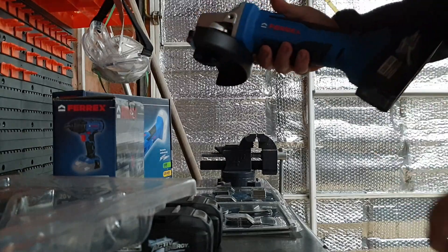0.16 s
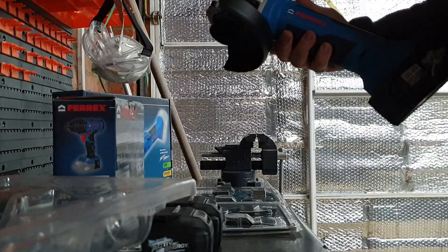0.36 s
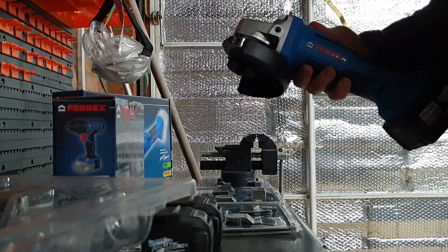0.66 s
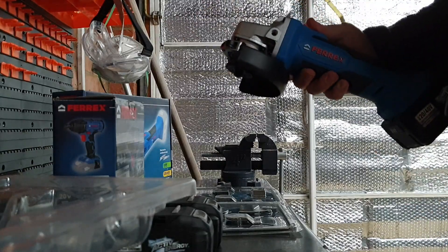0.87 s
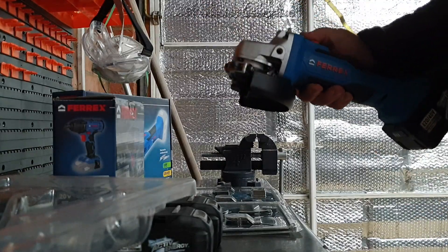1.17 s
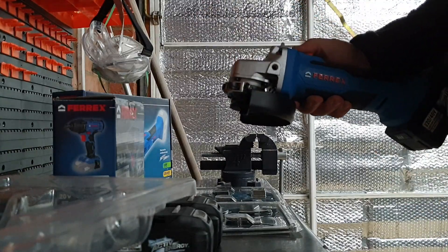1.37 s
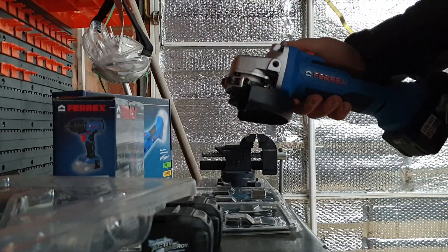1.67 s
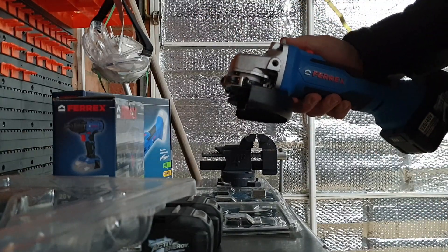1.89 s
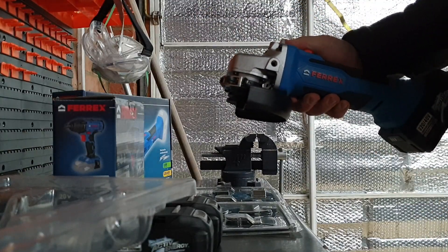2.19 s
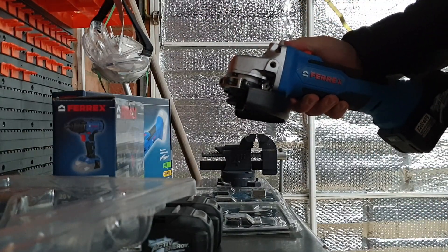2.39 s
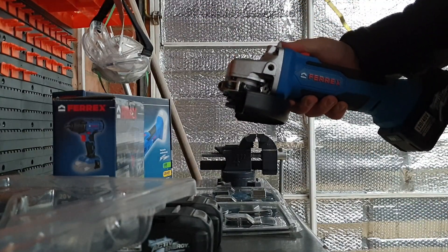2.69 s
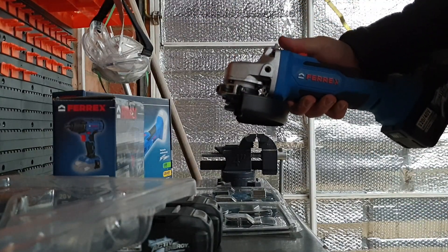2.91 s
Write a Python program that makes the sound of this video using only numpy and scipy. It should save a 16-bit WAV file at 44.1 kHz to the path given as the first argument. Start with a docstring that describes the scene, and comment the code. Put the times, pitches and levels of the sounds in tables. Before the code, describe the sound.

A cordless angle grinder in a small shed: light knocks and faint cloth rustle, a sharp switch snap, then the motor soft-starts, its gear rattle and whine climbing to the end, heard close in stereo.

```python
"""Small shed: a cordless angle grinder is handled, switched on and soft-starts in the air.
Knocks, cloth rustle and switch snaps are coloured noise; the controller whistles at a fixed pitch.
One rotor speed drives the gear knocks and sine whine; bevel gears rattle in their ringing metal head.
Brush hiss and fan air are filtered noise on level curves; faint hiss and low rumble lie beneath."""
import sys
import numpy as np
from scipy import signal
from scipy.fft import rfft, irfft, next_fast_len
from scipy.io import wavfile
from scipy.ndimage import uniform_filter1d

SR = 44100
rng = np.random.default_rng(int(sys.argv[2]) if len(sys.argv) > 2 else 0)


def materialize(psi):
    """Save the field psi as 16-bit PCM at rate SR to the path in sys.argv[1].

    A 1-D psi becomes a single channel; in a 2-D psi each row is a channel.
    """
    bounded = np.clip(np.atleast_2d(psi).T, -1, 1)
    quanta = np.round(bounded * 32767).astype(np.int16)
    wavfile.write(sys.argv[1], SR, quanta)


N = 134505
ROOM_DB = 5.5  # reflections re direct, gears and brushes
STANDSTILL_HZ = 4  # rotor speed at the start of the run-up

# ringing of gear head and guard: f/Hz, width/Hz, lift/dB
RINGS = [(790,80,3),(1190,70,4),(1785,60,4),(1910,45,8),(2205,20,4),(2443,14,11),(2765,50,3),(2975,70,3),(3805,20,5),(4225,40,5),(4695,35,8),(5530,100,4),(8950,120,4),(9670,130,4),(12300,170,4),(13750,260,7)]


def amp(db):
    """Decibels to gain."""
    return 10 ** (np.asarray(db) / 20)


def unit(x):
    """Scales to rms 1."""
    return x / np.sqrt(np.mean(x ** 2) + 1e-20)


def curve(points):
    """Control curve at every sample, linear between points."""
    return np.interp(np.arange(N) / SR, *np.transpose(points))


def read(points, hz):
    """Spectrum table read on a log-frequency axis."""
    f, value = np.transpose(points)
    return np.interp(np.log(hz + 1), np.log(f), value)


def tilted(points, db_per_octave):
    """Adds a constant slope per octave to a spectrum table."""
    return [(f, db + db_per_octave * np.log2(f)) for f, db in points]


def add(mix, s, sound):
    """Mixes a sound in at a time."""
    part = mix[round(s * SR):][:len(sound)]
    part += sound[:len(part)]


def colour(x, points, rings=(), size=4096):
    """Minimum-phase filter: broad colour plus narrow resonances, taps of unit energy."""
    hz = abs(np.fft.fftfreq(size, 1 / SR))
    peaks_db = sum(lift / (1 + (2 * (hz - f) / width) ** 2) for f, width, lift in rings)
    log_gain = np.log(amp(read(points, hz) + peaks_db))
    taps = np.fft.ifft(np.exp(np.conj(signal.hilbert(log_gain)))).real
    taps /= np.linalg.norm(taps)
    return np.apply_along_axis(signal.fftconvolve, -1, x, taps)[..., :N]


def drift(rate_hz):
    """Random wander of rms 1: noise under a Gaussian lowpass."""
    hz = np.fft.rfftfreq(N, 1 / SR)
    return unit(irfft(rfft(rng.standard_normal(N)) * np.exp(-(hz / rate_hz) ** 2), N))


def gears(speed, turns):
    """Each tooth contact knocks with random strength; the rattle's colour shifts with speed."""
    # gear rattle: t/s, level/dB
    rattle_level = [(.91,-55),(.98,-46),(1.04,-37.5),(1.17,-34),(1.2,-31.5),(1.36,-27.3),(1.5,-26.3),(1.7,-24.2),(1.8,-22.5),(2.1,-21.7),(3.03,-21.3)]
    # rattle spectra at low and high speed: f/Hz, level/dB
    slow_colour = [(600,-35.5),(1100,-16),(1600,-15),(1800,-4.5),(1930,-3.5),(2100,-6.5),(2400,0),(3000,0.5),(3700,-5.5),(4500,-14.5),(5200,-9),(6200,-17.5),(7200,-36.5),(9000,-48)]
    fast_colour = [(600,-32),(1100,-53.5),(1600,-30.5),(2100,-10.5),(2600,-4.5),(3200,-2.5),(3900,-0.5),(4500,-7.5),(5500,-8.5),(6300,-9),(7000,-25.5),(7600,-22.5),(8400,-15.5),(11000,-95.5)]
    teeth, knock_share, turn_throb = 13, .45, .28
    slow_hz, fast_hz = 23.1, 217.6  # rotor speeds of the two spectra

    tooth_count = np.floor(teeth * turns + .15 * drift(900))
    mesh = np.diff(tooth_count, prepend=0) > 0
    knocks = mesh * rng.standard_normal(N) / np.sqrt(speed + 30)
    drive = knock_share * unit(knocks) + (1 - knock_share) * rng.standard_normal(N)
    drive *= 1 + turn_throb * np.cos(2 * np.pi * turns)
    drive = spread(drive, ROOM_DB) * amp(.5 * drift(23))
    fast = np.clip((speed - slow_hz) / (fast_hz - slow_hz), 0, 1)
    rattle = (1 - fast) * colour(drive, slow_colour, RINGS) + fast * colour(drive, fast_colour, RINGS)
    power = uniform_filter1d((rattle ** 2).mean(0), size=8000)  # keeps the blend evenly loud
    return rattle / np.sqrt(power) * amp(curve(rattle_level))


def whine(speed, turns):
    """Rotor orders sweep up through the response of the head; unbalance hums near full speed."""
    # gear mesh, sidebands and commutator: multiples of rotor speed
    multiples = [11, 12, 13, 14, 15, 16, 17, 18, 26, 27, 35]
    # their strengths ahead of the head response: level/dB
    order_db = [-62, -44.5, -32, -39, -47, -46, -46, -35, -45, -65, -64]
    # response of the head: f/Hz, level/dB
    head_colour = [(300,-40),(1500,-25),(2300,-5),(3300,-3),(3800,0),(5000,-10),(6500,-10),(7500,-1),(10000,2),(13000,-8)]
    # hum at rotor speed: t/s, level/dB
    unbalance_level = [(2.2,-85),(2.6,-69.5),(2.75,-60),(2.9,-51.5),(3.04,-52.5)]
    reference_hz, db_per_doubling = 278, 5

    lines = np.zeros(N)
    for k, db in zip(multiples, order_db):
        level_db = db + read(head_colour, k * speed) + 3 * drift(49)
        lines += amp(level_db) * np.sin(2 * np.pi * (k * turns + rng.random()))
    lines *= amp(db_per_doubling * np.log2(speed / reference_hz))
    hum = amp(curve(unbalance_level)) * np.sin(2 * np.pi * turns)
    return np.sqrt(2) * (lines + hum)


def controller():
    """Chopped motor current whistles in the windings at a fixed pitch, wavering as the tool moves."""
    # whistle: t/s, level/dB
    whistle_level = [(.909,-47.5),(.95,-45.5),(1.05,-40.5),(1.21,-38),(1.32,-37),(1.6,-41),(1.85,-40.5),(2.2,-45.5),(2.7,-36),(3.04,-48)]
    chop_hz = 3968
    phase = 2 * np.pi * chop_hz * np.arange(N) / SR
    ports = []
    for side_db in (2.8, -3.2):  # left, right
        waver = phase + .3 * drift(21)
        tone = np.sin(waver) + amp(-37) * np.sin(2 * waver)
        ports.append(tone * amp(curve(whistle_level) + side_db + 2.8 * drift(7.1)))
    return np.sqrt(2) * np.array(ports)


def brushes():
    """Carbon brushes hiss and spark on the commutator: random impulses plus noise."""
    # brush hiss: t/s, level/dB
    hiss_level = [(.92,-63),(1.0,-68),(1.2,-58.5),(1.37,-51),(1.78,-43.5),(2.2,-38.5),(2.6,-36),(3.03,-31)]
    # hiss spectrum: f/Hz, level/dB
    hiss_colour = [(5500,-29),(7500,-2.5),(8300,-41.5),(9100,-2.5),(9800,-1),(10700,-2.5),(11700,-11),(12800,-15),(13800,-16.5),(15800,-20.5)]
    sparks_per_s, spark_spread_db, spark_share = 1500, 3.2, .68

    sparks = (rng.random(N) < sparks_per_s / SR) * rng.standard_normal(N)
    sparks *= amp(spark_spread_db * np.minimum(rng.exponential(1, N), 4))
    drive = spark_share * unit(sparks) + (1 - spark_share) * rng.standard_normal(N)
    return colour(spread(drive, ROOM_DB), hiss_colour, RINGS) * amp(curve(hiss_level))


def fan():
    """Cooling air rushes through the vents: noise through a fixed colour."""
    # fan air: t/s, level/dB
    air_level = [(.92,-67),(1.02,-54),(1.3,-57.5),(1.6,-49.5),(1.9,-49),(2.4,-45),(2.72,-43),(3.03,-40.5)]
    # air spectrum: f/Hz, level/dB
    air_colour = [(80,-23),(200,-13.5),(290,-5.5),(370,0.5),(520,2),(640,-1),(800,3),(1000,-3),(1400,2),(2200,-10),(4000,-62)]
    return colour(spread(rng.standard_normal(N), 0), air_colour, RINGS) * amp(curve(air_level))


def growl():
    """Labouring motor: rough low noise band; its centre dips, then rises as the rotor frees up."""
    # motor growl: t/s, f/Hz (band centre), level/dB
    growl_band = [(.91,407.3,-93),(0.961,402,-61),(1.2,370,-60.5),(1.36,420,-55.5),(1.5,507.3,-55),(1.701,741,-59.5),(2.0,790,-58),(2.4,808,-70)]
    width_hz = 203
    s, hz, db = np.transpose(growl_band)
    carrier = np.exp(2j * np.pi * np.cumsum(curve(np.c_[s, hz])) / SR)
    envelope = drift(width_hz / 2) + 1j * drift(width_hz / 2)
    return (envelope * carrier).real * amp(curve(np.c_[s, db]))


def click(s, db, decay_s, points, size=3000):
    """Decaying burst of contact noise, coloured by the part that is struck."""
    x = np.zeros(N)
    burst = rng.standard_normal(size) * np.exp(-np.arange(size) / SR / decay_s)
    add(x, s, amp(db) * burst)
    return colour(x, points)


def handling():
    """Hand knocks on the plastic body, cloth rustle, slide switch and the motor's starting kick."""
    # knocks on the housing (by hand; the last is the motor's kick as current flows):
    # t/s, level/dB, tilt/(dB/octave)
    knock_events = [(.0897,-48,-1),(.160,-57,-3),(.3445,-62,5),(.817,-66,3),(.841,-55,0),(.909,-47,0)]
    # switch snaps over, then hits its stop: t/s, level/dB
    snap_events = [(0.8461,-30),(0.849,-29)]
    # housing and switch spectra: f/Hz, level/dB
    knock_colour = [(300,-25),(1400,-20),(1750,-4),(2400,0),(3200,-9),(3900,-5),(5000,-14),(6400,-10),(7500,-26),(15000,-36)]
    snap_colour = [(200,-30),(800,-19),(1700,-5),(2800,1),(4500,-0.5),(6200,4),(8000,-12.5),(10500,3.5),(13000,-2),(16000,-19)]
    knock_decay_s, snap_decay_s = .0016, .0025
    knock_room_db, snap_room_db, pan_db = 1, -2.5, 2

    knocks = sum(click(s, db, knock_decay_s, tilted(knock_colour, tilt)) for s, db, tilt in knock_events)
    snaps = sum(click(s, db, snap_decay_s, snap_colour) for s, db in snap_events)
    both = shed(knocks + sleeve(), knock_room_db) + shed(snaps, snap_room_db)
    return both * amp([[pan_db], [-pan_db]])


def sleeve():
    """Cloth friction as the grip changes: noise under half-sine swells."""
    # sleeve brushing the tool: t/s, length/s, level/dB, tilt/(dB/octave)
    rustles = [(-.08,0.17,-76,6),(0.112,0.48,-79.5,-2.5),(0.548,0.09,-73,-4),(0.808,0.057,-74.5,-6)]
    # cloth spectrum: f/Hz, level/dB
    cloth_colour = [(500,-17.5),(1500,-7.5),(2600,-2.5),(4000,3.5),(5000,-7),(6400,1.5),(7500,-27),(9000,-17),(11000,-3),(13000,-18),(16000,-24)]
    t, out = np.arange(N) / SR, np.zeros(N)
    for s, length, db, tilt in rustles:
        swell = np.sin(np.pi * np.clip((t - s) / length, 0, 1))
        out += amp(db) * swell * colour(rng.standard_normal(N), tilted(cloth_colour, tilt))
    return out


def shed(x, wet_db, size=12288, count=3):
    """Direct sound plus dense decaying reflections that change as the tool moves."""
    # reverberation: f/Hz, t60/s
    decay = [(200,0.13),(2000,0.29),(6000,0.21),(15000,0.16)]
    move_s, shared_below_hz = .3434, 310

    taps = rng.standard_normal((count, 2, size)) * (rng.random((count, 2, size)) < .2)
    hz, t, z = signal.stft(taps, SR, nperseg=256)
    same = 1 / (1 + (hz[:, None] / shared_below_hz) ** 4)  # bass alike at both microphones
    z[:, 1] = same * z[:, 0] + np.sqrt(1 - same ** 2) * z[:, 1]
    tails = signal.istft(z * amp(-60 * t / read(decay, hz)[:, None]), SR)[1]
    tails[..., :40] = 0  # gap before the first reflection
    tails /= np.linalg.norm(tails, axis=2, keepdims=True)
    # tails fade in and out at constant total power
    steps = np.arange(N) / SR / move_s + np.arange(count)[:, None]
    places = np.sqrt(2 / count) * np.cos(np.pi * steps / count)
    wet = signal.oaconvolve((x * places)[:, None], tails, axes=2).sum(0)[:, :N]
    return microphones(x, wet, wet_db)


def microphones(x, reflected, wet_db):
    """Direct sound is slightly later but louder at the left microphone; reflections add at each."""
    lag_s, left_db, right_db = .00003, 5, -.4
    size = 2 * next_fast_len(N)
    hz = np.fft.rfftfreq(size, 1 / SR)
    late = irfft(rfft(x, size) * np.exp(-2j * np.pi * lag_s * hz))[:N]
    both = np.array([late, x]) + amp(wet_db) * reflected
    return both / np.hypot(1, amp(wet_db)) * amp([[left_db], [right_db]])


def spread(drive, wet_db):
    """Shed response to sustained noise: distinct reflections plus a smooth wash of fresh noise."""
    wash_share, x = .39, unit(drive)
    wash = microphones(x, rng.standard_normal((2, N)), wet_db)
    return (1 - wash_share) * shed(x, wet_db) + wash_share * wash


def background():
    """Faint stereo hiss and an uneven low room rumble, both filtered noise."""
    # hiss and rumble spectra: f/Hz, level/dB
    hiss_colour = [(100,-20),(400,-15),(900,-16),(3000,-13),(6500,-29),(8000,-33),(15500,-38)]
    rumble_colour = [(20,-34),(45,-4),(72,1.5),(100,-8.5),(160,-17),(300,-29.5),(1000,-43)]
    # rumble: t/s, level/dB
    rumble_level = [(0,-68),(.25,-65.5),(.4,-71),(.65,-67),(.75,-71),(.9,-63),(1.4,-63.5),(1.6,-73),(3,-68)]
    hiss_db = [[-81 + 1.5], [-81 - 1.5]]  # left, right
    hiss = colour(rng.standard_normal((2, N)), hiss_colour) * amp(hiss_db)
    rumble = colour(spread(rng.standard_normal(N), -2.5), rumble_colour)
    return hiss + rumble * amp(curve(rumble_level))


def scene():
    """Current flows at on_s and gates the running motor; one rotor speed drives gears and whine."""
    # rotor speed: t/s, f/Hz (turns per second)
    rotor_speed = [(.909, STANDSTILL_HZ), (1.25, 46.6), (1.7, 116.5), (1.722, 120.5), (1.956, 152.7),
                   (2.27, 196.1), (2.68, 252.8), (3.04, 311)]
    on_s, rise_s, wobble, whine_room_db = .909, .0018, .001, -4
    speed = np.maximum(curve(rotor_speed), 1) * (1 + wobble * drift(25))
    turns = np.cumsum(speed) / SR
    on = np.clip((np.arange(N) / SR - on_s) / rise_s, 0, 1)
    tool = on * (gears(speed, turns) + brushes() + fan() + controller())
    tool += shed(on * (growl() + whine(speed, turns)), whine_room_db)
    return tool + handling() + background()


def record(dry):
    """Band limit: linear-phase lowpass."""
    edge_hz = 15900
    lowpass = signal.firwin(511, edge_hz, window=("kaiser", 9), fs=SR)
    return signal.oaconvolve(dry, lowpass[None], "same")


dry = scene()
out = record(dry)
materialize(out)
```